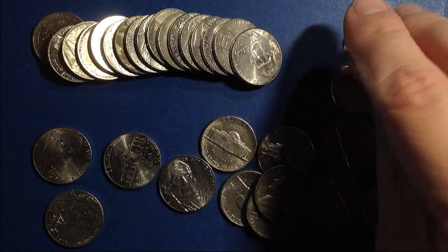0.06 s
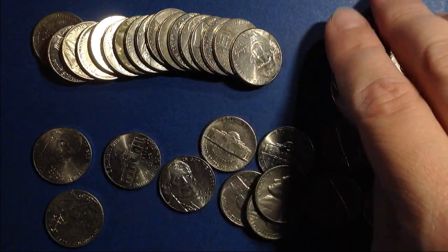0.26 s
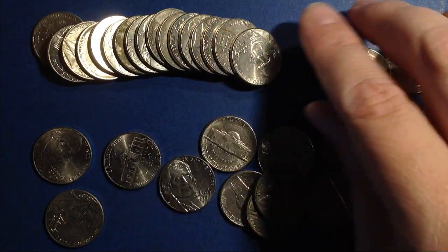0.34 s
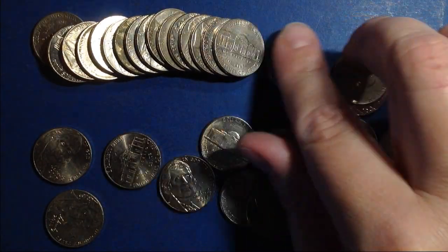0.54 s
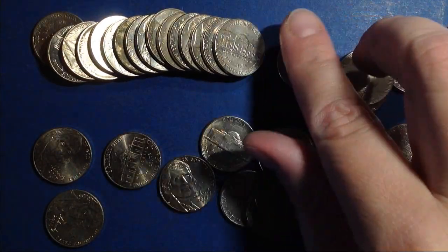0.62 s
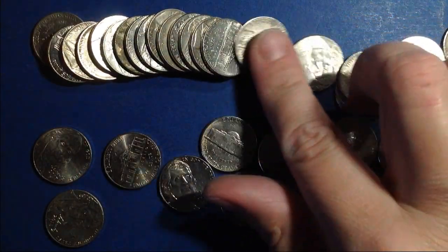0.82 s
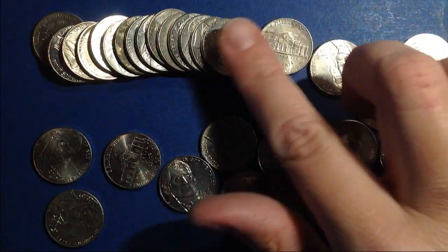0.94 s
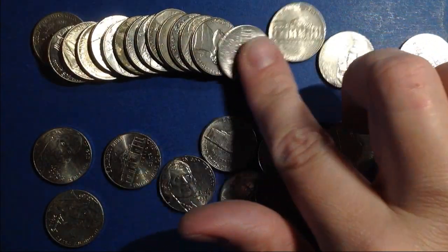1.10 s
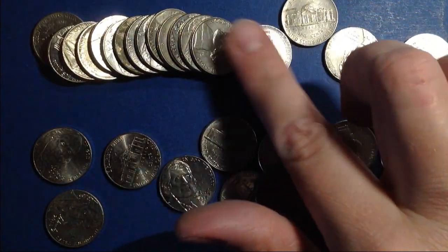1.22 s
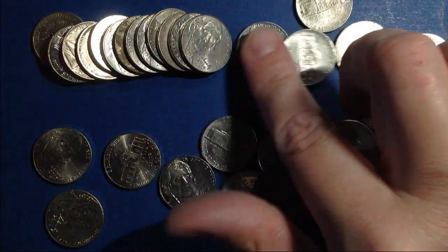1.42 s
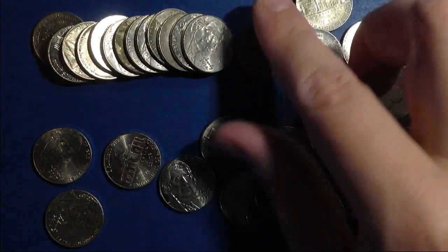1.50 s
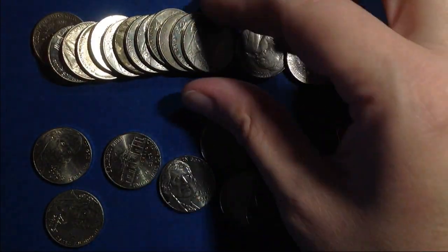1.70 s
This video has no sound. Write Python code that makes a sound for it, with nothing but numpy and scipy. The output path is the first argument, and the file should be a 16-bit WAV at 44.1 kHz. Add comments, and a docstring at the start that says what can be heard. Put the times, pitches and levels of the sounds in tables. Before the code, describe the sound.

A coin clacks onto a table, then four coins slide with short scrapes and clicks.

```python
"""A soft thud, then a sharp clack: a hand sets a coin down on a hard table, close up in a small, quiet room.
A finger then slides four coins, one by one, off an overlapping row. Each scrapes over its neighbour by
friction, ticks on its rim and drops flat with a clack. Every impact excites the modes of the table top,
which booms, and a free coin rings briefly at its own very high modes until it is damped."""
import sys
import numpy as np
from scipy import signal
from scipy.fft import rfft, irfft, next_fast_len
from scipy.io import wavfile
from scipy.ndimage import uniform_filter1d

SR = 44100
rng = np.random.default_rng(int(sys.argv[2]) if len(sys.argv) > 2 else 0)


def wav_out(sig):
    """Save sig, one row per channel (or a flat mono array), as 16-bit PCM at SR to the path in sys.argv[1]."""
    wavfile.write(sys.argv[1], SR, np.round(np.clip(np.atleast_2d(sig).T, -1, 1) * 32767).astype(np.int16))


N = 77175
TIME = np.arange(N) / SR

# spectrum of the steady room noise: f/Hz, level/dB
ROOM_NOISE_SPECTRUM = [(15, -38), (25, -16), (42, -33), (103, -7), (150, -6), (202, -5), (231, -7.5),
                       (278, 0), (404, -14.5), (529, -11), (1390, -17), (1860, -11.5), (2300, -16.5),
                       (9770, -20.5), (15000, -26.5)]
# impacts: t/s, thud level/dB, thud depth/(dB per octave downwards), clack level/dB, clack frequency ratio,
# tick level/dB, tick brightness/(dB per octave), chatter T60/s
IMPACTS = [(.2352, -39, 1, -59.5, 0.34, -52, -16, 0.0083), (0.3262, -49.5, 5.5, -47, 1.14, -41.5, 2, 0.023),
           (.3380, -33.5, 2.5, -29.5, .98, -30, 1, 0.02), (0.3402, -41.5, 21, -66, 1, -39, 16, 0.037),
           (.3500, -53.5, 11, -49.5, 0.58, -50, 2, 0.015), (0.3793, -69, 25, -45, 1.3, -45, 10, 0.0068),
           (0.386, -34.5, -1, -42, 0.69, -28, 8, 0.017), (0.393, -42, -15.5, -51, 1.05, -44.5, 2.5, 0.075),
           (0.5141, -58, 6.5, -72, 1.1, -55.5, 0, 0.012), (0.5322, -53, 4, -73, 1, -55, -3, 0.03),
           (.5780, -53, 8.5, -54, 1.13, -49.5, 0, 0.032), (.5880, -46.5, -1.5, -69, 0.68, -50, -5, .02),
           (0.598, -47, 0, -66, 0.56, -47.5, 1.5, 0.023), (.6132, -40.5, -4.5, -56.5, 0.77, -50, -4, 0.014),
           (0.6166, -46.5, -1.5, -50.5, 0.64, -66, 3, 0.022),
           (0.6304, -59, 26, -49.5, 1.15, -60, 12, 0.022), (.6415, -42.5, -2, -52, 0.8, -50.5, -11, .02),
           (0.8428, -45.5, -7, -60, 1, -44.5, -6, 0.012),
           (0.8498, -45.5, -5.5, -61, 0.9, -41.5, -2.5, 0.01),
           (0.9233, -54.5, 10, -61, 0.83, -44.5, -3.5, 0.013),
           (.9290, -43, 0.5, -42, 1.1, -48, -29, 0.0053), (0.9308, -50, 4, -45, 0.638, -57, -6, 0.023),
           (1.045, -63.5, 8.5, -88, 0.85, -70, -6, 0.022), (1.093, -56, 4, -78, 0.82, -79, -11, 0.018),
           (1.0994, -49, 1, -62, 1.2, -40, -1.5, 0.023), (1.3501, -64, 6, -88, 1, -74, -14, .02),
           (1.3628, -61.5, 4, -72, 1.1, -58, -3.5, 0.0096),
           (1.4139, -50, 2, -82, 0.87, -45.5, -2.5, 0.0091), (1.4454, -53, -14, -70, 1.4, -48, -12, 0.017),
           (1.4531, -84, -4, -42.5, 2.1, -38, 21, .02), (1.4637, -34, -1, -41.5, 0.92, -42.5, -22, 0.015),
           (1.5078, -79, -4, -57.5, 1.22, -58, 9, 0.01)]
# modes of the table top: f/Hz, level/dB, T60/s
TABLE_MODES = [(199, -18.5, 0.023), (253, -7, 0.16), (315, -16.5, 0.042), (469, -13.5, 0.17),
               (515, -0.5, 0.065), (634, 4, 0.03), (705, -2.5, 0.067), (834, 2.5, 0.027), (908, 2.5, 0.027),
               (975, 4, 0.026), (1019, -2.5, 0.057), (1234, -3, 0.02), (1453, -10.5, 0.055)]
# spectra of a coin's face clacking and of its rim ticking: f/Hz, level/dB
CLACK_SPECTRUM = [(40, -29), (300, -18), (1200, -12.5), (2000, -11), (2600, -4), (3000, 2.5), (3500, 3),
                  (4150, -8), (5000, -1), (7000, -11), (10000, -47), (16000, -16.5)]
TICK_SPECTRUM = [(40, -50), (300, -28), (2000, -22.5), (3200, -13.5), (5400, -0.5), (7600, -8), (9300, -6),
                 (10600, -12.5), (11800, -6), (13000, -10.5), (14200, -8.5), (15500, -5.5)]
# free vibrations of a coin: t/s, level/dB, time until damped/s, frequency ratio
FREE_RINGS = [(.3268, -53, 0.007, 0.69), (0.339, -33.5, .028, 1), (0.3847, -39.5, 0.0077, 0.74),
              (0.579, -54, .015, .9), (0.631, -60.5, 0.013, 0.97), (0.8412, -46, .008, .9),
              (1.4507, -46, 0.013, .895), (1.463, -48, 0.0082, .84)]
# modes of a coin: f/Hz, level/dB, T60/s
COIN_MODES = [(11741, -9, .2), (11860, -15, .15), (13940, 0, .5), (14030, -11, .2), (15010, -10, .12)]
# the hand's weight nudges the table: t/s, level/dB
HAND_NUDGES = [(.342, -65), (.378, -63), (.925, -65), (1.408, -66)]
# spectrum of a nudge: f/Hz, level/dB
NUDGE_SPECTRUM = [(15, -7), (35, 7), (60, -11), (110, 1), (200, -4), (500, -28), (2000, -63)]
# one envelope for each slide: t/s, scrape level/dB, rumble level/dB
SLIDE_ENVELOPES = [
    [(.525, -70, -74), (.548, -60.5, -57.5), (.57, -47, -47.5), (.603, -55, -48.5), (.622, -59.5, -61),
     (.654, -57.5, -53), (.672, -83, -66)],
    [(.80, -70, -70), (.826, -58.5, -56), (.838, -48, -48.5), (.862, -51, -52), (.876, -50, -60),
     (.892, -50, -54.5), (.92, -55.5, -53), (.955, -88, -63), (.975, -75, -96)],
    [(1.088, -105, -80), (1.102, -56, -48), (1.12, -67, -60.5), (1.14, -59, -54.5), (1.165, -59.5, -55.5),
     (1.195, -54.5, -56.5), (1.22, -62, -59.5), (1.24, -80, -90)],
    [(1.34, -84, -90), (1.353, -70.5, -59), (1.378, -72, -92), (1.39, -55, -51), (1.405, -51, -58),
     (1.428, -51, -61.5), (1.449, -45.5, -48), (1.485, -51, -67), (1.53, -87, -70)],
]
# one row for each slide: scrape brightness/(dB per octave), rumble depth/(dB per octave downwards)
SLIDE_TILTS = [(1, 0), (0, -2.5), (-3, -1), (1.5, -1.5)]
# spectrum of coin scraping on coin: f/Hz, level/dB
SCRAPE_SPECTRUM = [(40, -51.5), (300, 6), (1800, -26.5), (2700, -13), (4100, 0.5), (4700, -4.5), (5700, 1),
                   (7400, -3.5), (10500, -15), (12500, -9.5), (13800, -15), (15000, -16)]

KNOCK_HZ, KNOCK_DB, KNOCK_T60_S = 660, 13.5, 0.0072  # the first push under the coin, at zero depth
KNOCK_OCTAVES_PER_DB = 0.26  # a shallower thud starts with a higher knock
MODE_SCATTER_DB, MODE_BUILD_S = 2, 0.0021
TABLE_LOW_HZ, TABLE_HIGH_HZ = 210.6, 1220
CONTACT_RISE_S, NUDGE_T60_S = 0.0001, 0.071
DAMPED_T60_S, LINGER_DB, LINGER_T60_S = 0.024, -16, 0.26  # a faint share of the ring outlasts the damping
GRAINS_PER_S, GRAIN_SPREAD_DB, JUDDER_DB, JUDDER_PER_S = 11000, 1.5, 1.54, 180
RUMBLE_BAND_HZ = (326, 1260)
ROOM_TABLE_DB, ROOM_TREBLE_DB, ROOM_CLACK_DB, ROOM_RING_DB = -16.5, -13.5, -19, -17  # reflected shares


def from_db(db):
    """Amplitude ratio of a level in decibels."""
    return 10 ** (np.asarray(db) / 20)


def rms_one(x):
    """Normalisation to unit rms."""
    return x / np.sqrt(np.mean(x ** 2) + 1e-20)


def unit_hit(x):
    """Normalisation of a transient to unit rms over its first 7 ms."""
    return x / np.sqrt(np.mean(x[:300] ** 2))


def add(out, s, sound):
    """Superposition of a sound starting at s seconds."""
    i = int(s * SR)
    out[i:i + len(sound)] += sound[:N - i]


def coloured(x, points, tilt_db=0):
    """Minimum-phase filtering through (f/Hz, level/dB) points, tilted by tilt_db per octave above 5 kHz."""
    size = 2 * next_fast_len(len(x))
    hz, db = np.transpose(points)
    tilted_db = db + tilt_db * np.log2(np.maximum(hz, 5000) / 5000)
    octaves = np.log2(np.maximum(np.fft.rfftfreq(size, 1 / SR), 1))
    gain = from_db(np.interp(octaves, np.log2(hz), tilted_db))
    cepstrum = irfft(np.log(gain))
    cepstrum[1:size // 2] *= 2  # folding onto positive time makes the filter causal
    cepstrum[size // 2 + 1:] = 0
    return irfft(rfft(x, size) * np.exp(rfft(cepstrum)))[:len(x)]


def room_noise(level_db=-65.5):
    """Stationary filtered noise: the quiet background of the room."""
    return from_db(level_db) * rms_one(coloured(rng.standard_normal(N), ROOM_NOISE_SPECTRUM))


def table_thud(depth_db):
    """Impulse response of the table: a knock, then damped modes weighted by where the blow lands."""
    t = TIME[:SR // 4]
    modes = np.zeros(len(t))
    for hz, db, t60 in TABLE_MODES:
        mode_db = db + depth_db * np.log2(KNOCK_HZ / hz) + rng.normal(0, MODE_SCATTER_DB)
        modes += from_db(mode_db - 60 * t / t60) * np.sin(2 * np.pi * hz * t)
    knock_hz = KNOCK_HZ * 2 ** (-KNOCK_OCTAVES_PER_DB * depth_db)
    knock = from_db(KNOCK_DB - 60 * t / KNOCK_T60_S) * np.sin(2 * np.pi * knock_hz * t)
    thud = knock + modes * (1 - np.exp(-t / MODE_BUILD_S))
    thud = signal.sosfilt(signal.butter(4, TABLE_LOW_HZ, "high", fs=SR, output="sos"), thud)
    return unit_hit(signal.sosfilt(signal.butter(3, TABLE_HIGH_HZ, fs=SR, output="sos"), thud))


def chatter(spectrum, t60, tilt_db=0):
    """Brief metal contact is broadband: a decaying noise burst, whitened and then coloured."""
    t = TIME[:SR // 16]
    burst = rng.choice([-1, 1], len(t)) * from_db(-60 * t / t60)
    bins = rfft(burst, 2 * len(t))
    smoothed_power = uniform_filter1d(np.abs(bins) ** 2, size=50)
    white = irfft(bins / np.sqrt(smoothed_power))[:len(t)]
    rise = 1 - np.exp(-t / CONTACT_RISE_S)
    return unit_hit(coloured(white * rise, spectrum, tilt_db))


def impacts():
    """An impact excites both bodies: the table thuds, the coin's face clacks and its rim ticks."""
    thuds, clacks, ticks = np.zeros((3, N))
    for s, thud_db, depth_db, clack_db, ratio, tick_db, bright_db, t60 in IMPACTS:
        clack_spectrum = [(hz * ratio, db) for hz, db in CLACK_SPECTRUM]
        add(thuds, s, from_db(thud_db) * table_thud(depth_db))
        add(clacks, s, from_db(clack_db) * chatter(clack_spectrum, t60))
        add(ticks, s, from_db(tick_db) * chatter(TICK_SPECTRUM, t60, bright_db))
    return thuds, clacks, ticks


def reverberation(x, t60=0.2, delay_s=0.012):
    """The diffuse field of a small room: convolution with delayed, exponentially decaying noise."""
    t = TIME[:SR // 2]
    tail = rng.standard_normal(len(t)) * from_db(-60 * t / t60) * (t > delay_s)
    return signal.fftconvolve(x, tail / np.sqrt(np.sum(tail ** 2)))[:N]


def coin_rings():
    """Free vibration of a coin's modes, damped once it lies flat or meets the finger."""
    out, t = np.zeros(N), TIME[:SR // 4]
    for s, level_db, free_s, ratio in FREE_RINGS:
        ring = sum(from_db(db - 60 * t / t60) * np.sin(2 * np.pi * hz * ratio * t)
                   for hz, db, t60 in COIN_MODES)
        damped_db = -60 * np.maximum(t - free_s, 0) / DAMPED_T60_S
        linger_db = LINGER_DB - 60 * t / LINGER_T60_S
        add(out, s, ring * from_db(level_db + np.maximum(damped_db, linger_db)))
    return out


def hand_nudges():
    """A soft force excites mainly low frequencies: faint bumps as the hand presses down."""
    out, t = np.zeros(N), TIME[:SR // 4]
    for s, db in HAND_NUDGES:
        low_noise = rms_one(coloured(rng.standard_normal(len(t)), NUDGE_SPECTRUM))
        add(out, s, from_db(db - 60 * t / NUDGE_T60_S) * low_noise)
    return out


def friction():
    """Friction as shot noise: embossed faces collide in dense, uneven impulses whose level judders."""
    judder_db = JUDDER_DB * np.interp(TIME * JUDDER_PER_S, np.arange(N), rng.standard_normal(N))
    sizes = from_db(GRAIN_SPREAD_DB * np.minimum(rng.exponential(1, N), 4))
    signs = rng.choice([-1, 1], N)
    collides = rng.random(N) < GRAINS_PER_S / SR
    return sizes * signs * collides * from_db(judder_db)


def table_rumble(grains, depth_db):
    """Forced vibration: the impulses of rubbing drive only the table's middle modes."""
    band = signal.butter(3, RUMBLE_BAND_HZ, "band", fs=SR, output="sos")
    response = signal.sosfilt(band, table_thud(depth_db))
    return rms_one(signal.fftconvolve(grains, response)[:N])


def slides():
    """One friction force drives two bodies: the table rumbles and the sliding coin hisses."""
    grains = friction()
    rumble, scrape = np.zeros((2, N))
    for envelope, (bright_db, depth_db) in zip(SLIDE_ENVELOPES, SLIDE_TILTS):
        s, scrape_db, rumble_db = np.transpose(envelope)
        moving = (TIME > s[0]) & (TIME < s[-1])
        hiss = rms_one(coloured(grains, SCRAPE_SPECTRUM, bright_db))
        rumble += moving * from_db(np.interp(TIME, s, rumble_db)) * table_rumble(grains, depth_db)
        scrape += moving * from_db(np.interp(TIME, s, scrape_db)) * hiss
    return rumble, scrape


def scene():
    """Superposition of direct sound, reverberation and room noise, in one channel."""
    thuds, clacks, ticks = impacts()
    rumble, scrape = slides()
    table = thuds + rumble + hand_nudges()
    treble = ticks + scrape
    rings = coin_rings()
    tail = reverberation(from_db(ROOM_TABLE_DB) * table + from_db(ROOM_TREBLE_DB) * treble
                         + from_db(ROOM_CLACK_DB) * clacks + from_db(ROOM_RING_DB) * rings)
    return (table + clacks + treble + rings + tail + room_noise())[None]


def record(dry):
    """Band limiting: an elliptic low-pass cuts the highest treble steeply."""
    cutoff_hz = 15250
    return signal.sosfilt(signal.ellip(10, .3, 70, cutoff_hz, fs=SR, output="sos"), dry)


dry = scene()
out = record(dry)
wav_out(out)
```